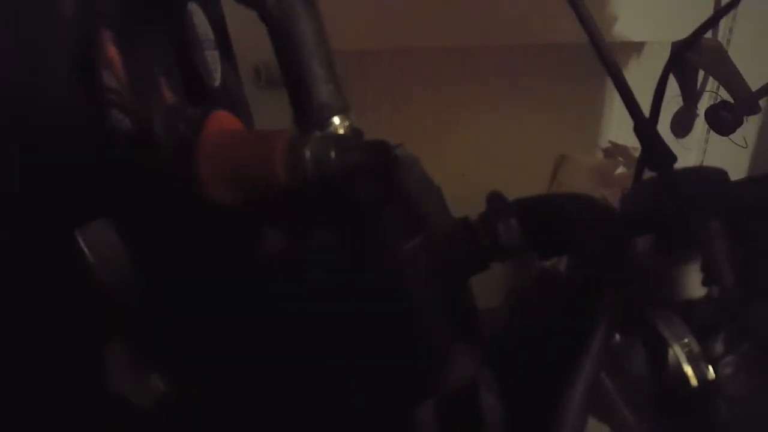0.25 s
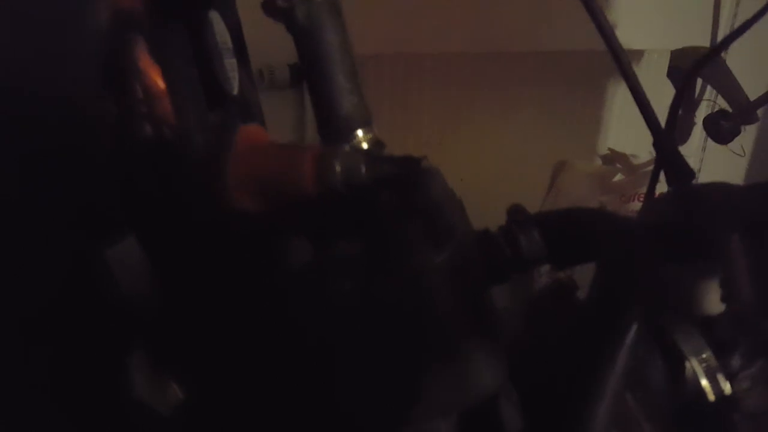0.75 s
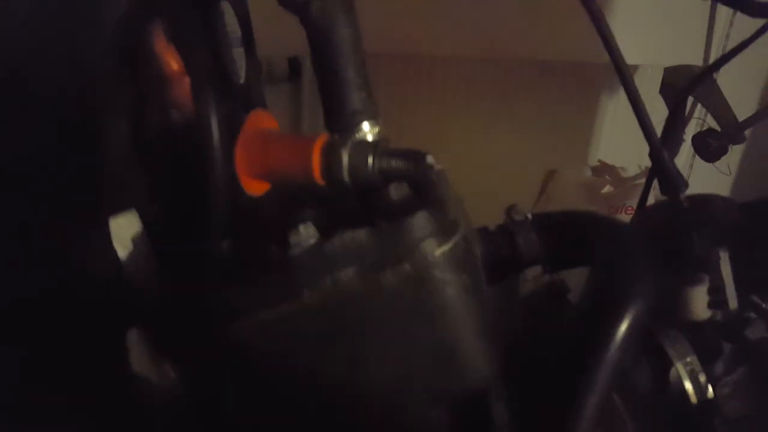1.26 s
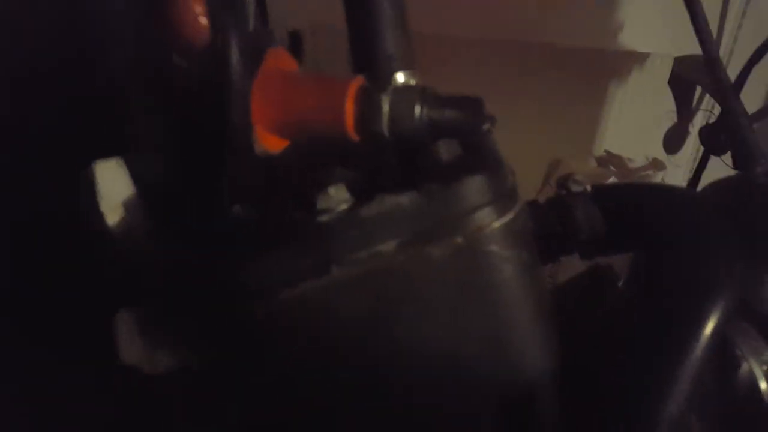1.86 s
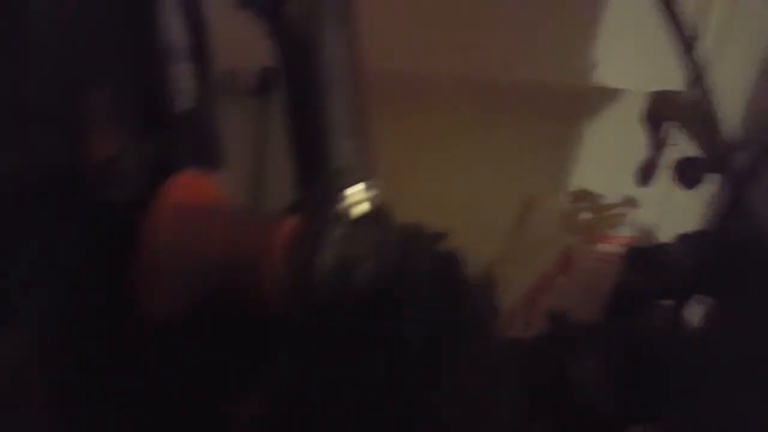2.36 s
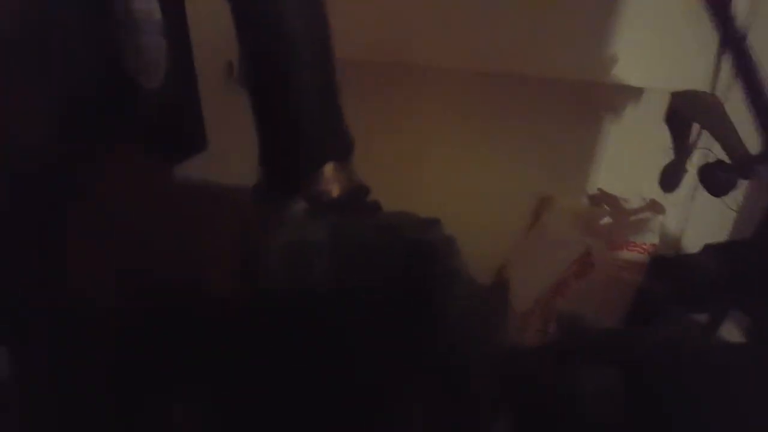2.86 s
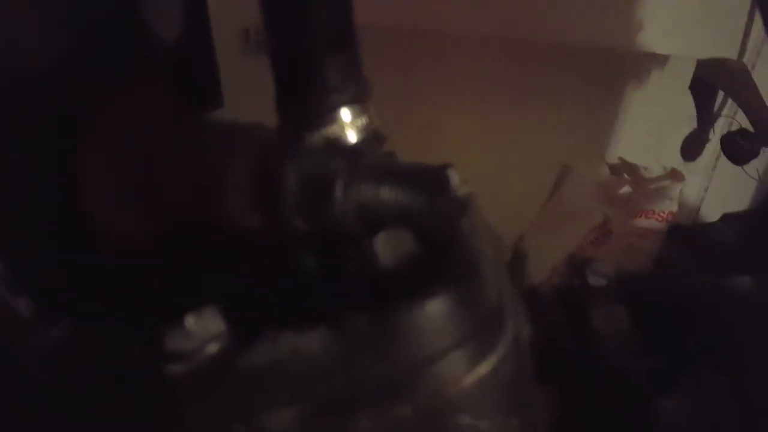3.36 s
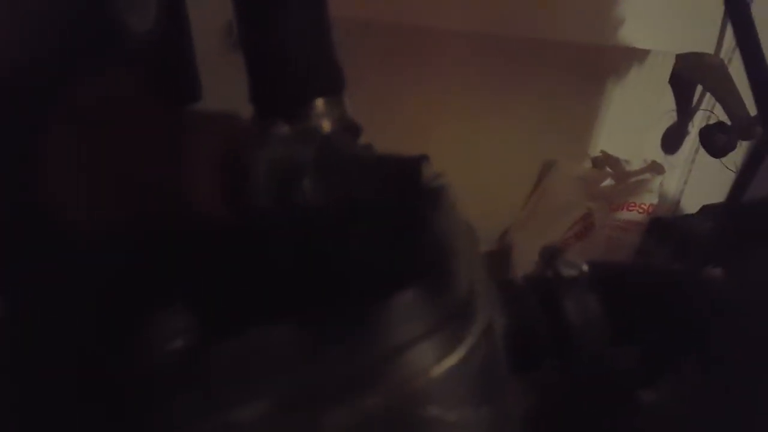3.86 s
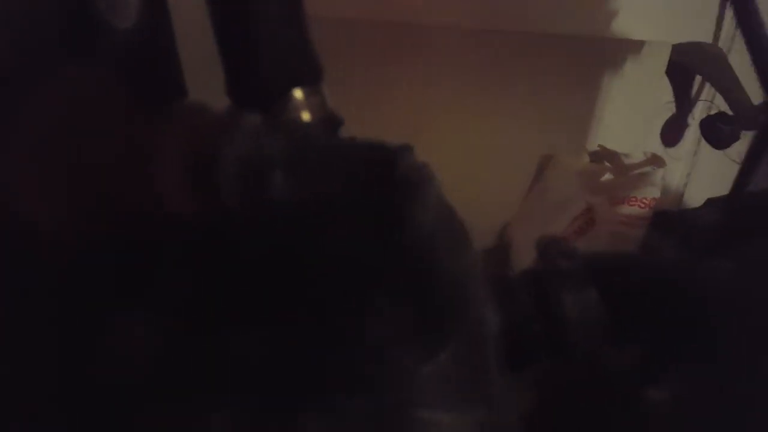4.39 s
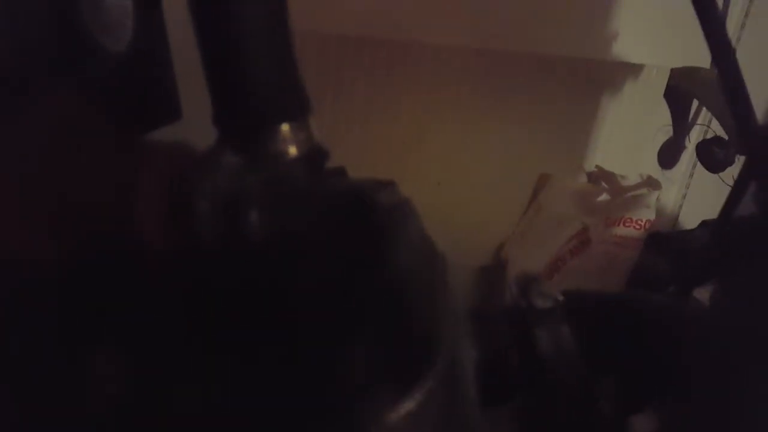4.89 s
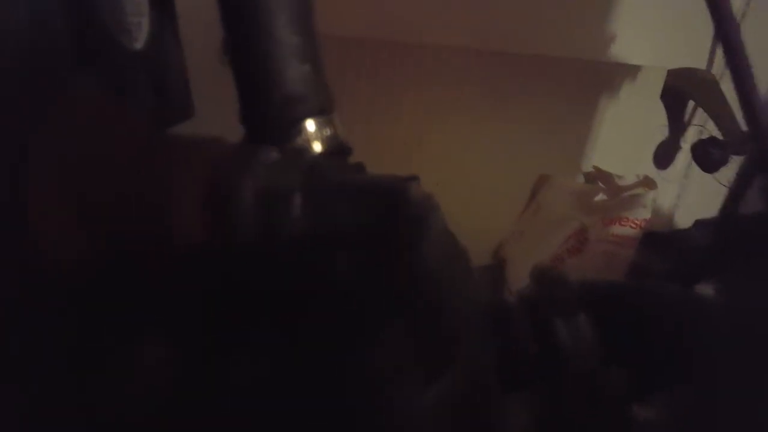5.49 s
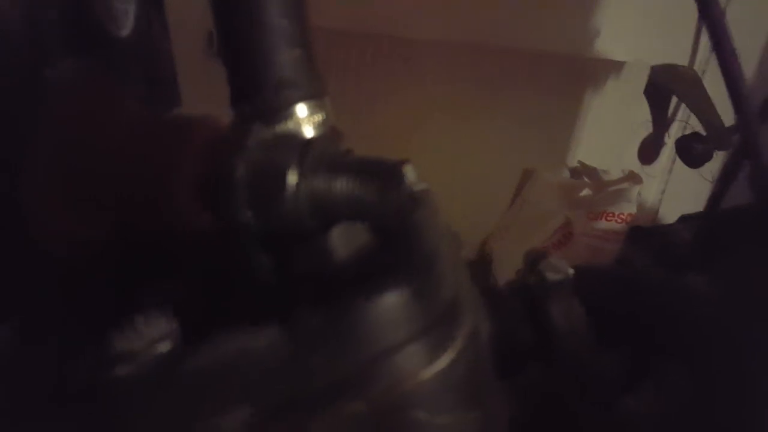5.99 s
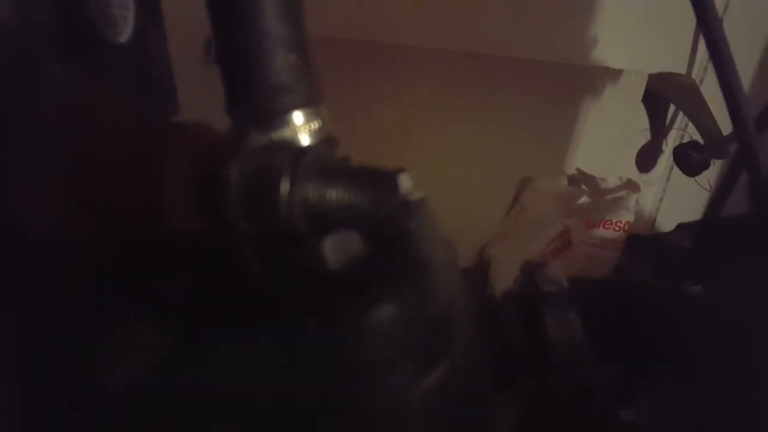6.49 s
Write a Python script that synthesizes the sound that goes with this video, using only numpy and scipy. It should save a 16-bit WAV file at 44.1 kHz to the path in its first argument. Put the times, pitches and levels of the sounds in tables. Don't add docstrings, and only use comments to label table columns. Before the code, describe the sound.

A motorcycle is kick-started twice without firing, each kick a hiss swelling into a rattling whirl, with ratchet clicks and a boot knock between.

```python
import sys
import numpy as np
from scipy import signal
from scipy.fft import rfft, irfft, next_fast_len
from scipy.io import wavfile
from scipy.ndimage import uniform_filter1d, map_coordinates

SR = 44100
rng = np.random.default_rng(int(sys.argv[2]) if len(sys.argv) > 2 else 0)


def store_pcm(level_fs):
    pcm = np.round(np.clip(level_fs, -1, 1) * 32767).astype(np.int16)
    wavfile.write(sys.argv[1], SR, np.atleast_2d(pcm).T)


def gain_from_db(level_db):
    decades = np.asarray(level_db, float) / 20
    return 10 ** decades


N = 297185
FAST = next_fast_len(N)
HZ = np.maximum(np.fft.rfftfreq(FAST, 1 / SR), 1)

TOP_DEAD_CENTRE = (1.1737, 5.68)
SEAL_S = (-.76, -.725)
# pitch in Hz, width in Hz, level in dB.
TIGHT_LEAK = [(4970, 53, -8), (6510, 76, -5.5), (7350, 90, -11), (8400, 71, -6.5), (9070, 170, 4),
              (10370, 98, -4.5), (11400, 88, -13.5), (11400, 89, -8.5), (11800, 180, -7),
              (12000, 340, -6.5), (13200, 410, -7), (14250, 200, -4), (14800, 200, -4), (14950, 200, -3)]
# frequency in Hz, level in dB per Hz.
TIGHT_AIR = [(1500, -23), (3000, -28.5), (4400, -40.5), (6000, -28), (8000, -23.5), (12800, -33),
             (15900, -24)]
# pitch in Hz, width in Hz, level in dB.
OPEN_LEAK = [(3670, 190, -12.5), (6770, 81, -2.5), (8000, 160, -10), (8340, 49, -5.5), (8950, 51, -8),
             (9400, 160, -1.5), (12500, 99, -4), (13700, 170, -11.5)]
# frequency in Hz, level in dB per Hz.
OPEN_AIR = [(1500, -22.5), (4300, -8.5), (6000, -6.5), (7000, 0.5), (9500, -1.5), (11800, -12),
            (15900, -4.5)]
# seconds from top dead centre, pitch factor.
GAP_PITCH = [(-0.94, 1.2), (-.65, 1.0), (-.42, .99), (0.039, .94), (0.41, 0.87)]
SECOND_GAP_SAG = 1.8
GAP_WAVER_DB = 2.5
# seconds from top dead centre, pitch in Hz.
CAVITIES = [
    [(-.66, 3450), (-.6, 3650), (-.42, 3650), (-.33, 3250), (-.25, 2750)],
    [(-.33, 2350), (-.25, 2480), (-.1, 2400)],
    [(-.6, 5800), (-.5, 5700), (-.4, 5650), (-.3, 5300), (-.13, 5100)],
    [(-.73, 4600), (-.66, 4480), (-.56, 3700)],
    [(-.31, 3850), (-.2, 3700), (-.12, 3500)],
    [(-.61, 9150), (-.5, 9050), (-.36, 8950)],
    [(-.72, 10200), (-.67, 9700), (-.62, 9200)],
    [(-.4, 8300), (-.33, 8750), (-.25, 8800)],
    [(-.32, 6950), (-.24, 6850)],
    [(-.82, 2600), (-.74, 3100), (-.66, 3300)],
]
CAVITY_DB = [(-61, -56, -55.5, -66, -59, -65, -56, -46.5, -52, -70),
             (-53, -54, -53.5, -53.5, -60, -51, -73, -60, -45, -85)]

# pitch in Hz, width in Hz, level in dB.
CASES = [(354, 63, -1.5), (499, 100, -3.5), (707, 15, -2.5), (885, 13, -3), (975, 12, 0), (1338, 7.3, -1),
         (1660, 55, -20)]
# frequency in Hz, level in dB per Hz.
RUMBLE = [(150, -43.5), (260, -6.5), (523, -8), (667, -8), (989, -4), (1450, -12), (1700, -11.5),
          (2400, -59)]
# frequency in Hz, level in dB per Hz.
THUD = [(18, -39), (30, -13), (102, -10.5), (140, 0.5), (157, 6), (179, -28), (200, -12.5), (300, -55)]
# frequency in Hz, level in dB per Hz.
CLATTER = [(1400, -9.5), (1950, 2), (2600, -9.5), (4500, -7.5)]
# frequency in Hz, level in dB per Hz.
BLOW_OFF = [(4500, -4.5), (5590, -4.5), (6300, -8.5), (9500, -12)]
# frequency in Hz, level in dB per Hz.
JET = [(9500, 1), (12600, -0.5), (15900, -4)]

# seconds from top dead centre, level in dB at the first kick,
# level in dB at the second, hold in seconds, fall in dB per s.
TIGHT_SURGES = [
    (-0.594, -55.5, -74.5, 0.026, 95),
    (-0.84, -47, -61.5, 0.29, 80),
    (-.58, -48, -41.5, 0.17, 78),
    (-.29, -36.5, -39.5, 0.12, 249),
]
OPEN_SURGES = [
    (-0.77, -48, -50.5, 0.28, 98),
    (-.29, -37.5, -42, 0.045, 70),
    (-0.206, -32.5, -38, 0.052, 279),
    (-.1, -48, -69.5, .01, 96.5),
]
BOOM_SURGES = [
    (-.6, -44, -43, .01, 64.5),
    (-.3, -58.5, -47.5, .02, 89.5),
    (-.14, -39, -30.5, 0.0055, 263),
    (.005, -29, -20.5, .005, 334.5),
    (.12, -33, -38, .17, 110),
]
RUMBLE_SURGES = [
    (-0.684, -48, -54.5, 0.011, 79),
    (-0.603, -58, -46.5, 0.0097, 107),
    (-.3, -55, -51.5, 0.17, 58.5),
    (-0.1347, -35, -35.5, 0.24, 201),
    (-0.0012, -22, -22.5, 0.12, 89),
]
THUD_SURGES = [
    (-.6, -59.5, -56, 0.01, 117),
    (-.14, -31, -30, .005, 197.5),
    (.005, -29.5, -25.5, .005, 221),
    (.1, -39, -37, 0.043, 67.5),
]
CLATTER_SURGES = [
    (-.13, -51.5, -46, 0.11, 197),
    (.02, -28, -22, 0.022, 251),
    (.05, -24, -24, 0.036, 166.5),
    (.19, -37, -40, 0.0092, 88),
]
BLOW_SURGES = [
    (.015, -23, -27, 0.069, 215),
    (.19, -39, -41, 0.00213, 113),
]
JET_SURGES = [
    (.02, -31.5, -30, .05, 151),
    (.13, -38.5, -36.5, .04, 220.5),
    (.3, -68.5, -73, .01, 35),
]
SWIFTER_RISE = 2.5

# start in seconds, peak
# in dB, pitch in Hz, decay by 60 dB in seconds, swell in seconds.
BUMPS = [(0.284, -29, 556, 0.018, 0.0013), (0.342, -34, 122, 0.029, 0.0019),
         (1.024, -11, 374.4, 0.088, .004), (1.059, -17, 150, 0.33, .003),
         (1.118, -12.5, 468, 0.058, 0.0072), (1.169, -2, 255, 0.031, .007), (1.209, -9.5, 974, 0.05, .003),
         (1.266, -8, 511, 0.06, .01), (1.268, -14, 975, .06, .006), (1.304, -7.5, 973, 0.09, .004),
         (1.328, -11, 975, .04, .004), (1.341, -12, 910, .03, .002), (1.36, -14, 975, .08, 0.0046),
         (1.371, -15.5, 242, 0.07, .008), (1.452, -13.5, 320, 0.038, 0.0012),
         (1.641, -29, 240, 0.058, .002), (2.148, -20, 135.5, 0.0077, 0.00095),
         (2.2238, -18.5, 4300, 0.015, 0.00019), (2.399, -37, 4000, .01, 0.00039),
         (3.374, -37.5, 3500, .015, .0003), (6.666, -5, 3700, 0.0066, 0.00044),
         (2.778, -38.5, 1083, 0.081, 0.0011), (3.381, -44, 505, .03, .002),
         (4.782, -30, 347.4, 0.13, 0.0011), (4.843, -25, 392, 0.068, 0.0012),
         (5.109, -30, 234, 0.12, 0.0024), (5.525, -10.5, 477, 0.025, .005), (5.539, -7, 384, 0.036, .003),
         (5.626, -12, 439, 0.062, .006), (5.676, -2, 249, 0.051, 0.0067), (5.701, -5.5, 328, .015, .001),
         (5.717, -8, 694, 0.02, .001), (5.769, -3, 536, 0.04, .013), (5.803, -7.5, 975, 0.041, .005),
         (5.813, -12.5, 532, 0.13, .006), (5.875, -19, 975, 0.091, 0.0033),
         (5.922, -18, 958, 0.065, 0.0039), (5.968, -10, 320, 0.049, .001), (6.006, -25, 312, 0.033, 0.0016),
         (6.388, -29.5, 1500, 0.021, 0.0011)]

# drop in seconds, seconds since the slip,
# peak in dB, dullness 0-1, left over right in dB.
PAWL = [
    (1.8349, .0124, -28.5, 0.58, 19),
    (2.0403, .0064, -20, 0.72, 0),
    (2.2239, 0.0088, -19, 0.5, 0),
    (6.3124, .0077, -23, 0.69, 22),
    (6.4676, .0078, -21.5, 0.59, -16.5),
    (6.666, .0073, -8.5, 0.25, -13),
]
SLIP_DB, SLIP_DULL, SLIP_PAN_DB, PAWL_RING_DB = -26.5, 0.56, 4, -43
# pitch in Hz, level in dB, decay by 60 dB in seconds.
LEVER = [(2700, -22, .15), (3350, -20, .15), (4100, -17, 0.15), (5070, -7, .25), (5280, -18, 0.15),
         (12490, -13, .15)]
# level in dB, decay factor.
PAWL_RINGS = [(1, 1.2), (0, 5.0), (-5, .6), (-2, .45), (-2, 1.1), (2, .6)]
RING_PITCH = (1, 1.02, 1, .99, .986, 1)
# start in seconds, peak in dB, dullness 0-1, left over right in dB.
TICKS = [(1.0944, -23.5, 0.21, 6), (1.203, -12.5, .5, 0), (1.212, -12, .6, -2), (1.223, -12.5, .5, 2),
         (1.34, -16, .5, 5.5), (1.427, -29, .4, 2), (1.451, -24.5, .8, -2), (1.4886, -31.5, .7, -4),
         (1.774, -52.5, 0.6, 14), (2.153, -29, 0.77, 18), (2.399, -35.5, 0.27, 19.5), (2.779, -38.5, 1, 6),
         (2.8507, -47.5, 0.64, 4.5), (2.9479, -45.5, 0.57, 23), (2.9517, -49.5, 0.7, 27),
         (3.3742, -38.5, 0.77, -6.5), (3.3788, -45.5, 0.7, 1.5), (3.4231, -43.5, 0.79, 5),
         (5.117, -36, 0.4, 20), (5.7083, -11, .6, -2), (5.7185, -7.5, .7, 2), (5.968, -25.5, 0.7, 2),
         (6.007, -28.5, .85, 2), (6.1844, -51, 0.64, -15), (6.1934, -52, 0, 20)]

# start in seconds, level in dB, hold in seconds, fall in dB per s.
DRAG = [
    (2.055, -38, .01, 600.5),
    (2.072, -26.5, 0.0072, 700.5),
    (2.088, -28.5, .006, 600),
    (2.101, -29.5, .003, 799.5),
    (2.114, -29.5, .005, 899.5),
    (2.148, -42, 0.005, 501.5),
    (2.13, -45.5, 0.075, 702),
]
# pitch in Hz, width in Hz, level in dB.
DRAG_RINGS = [(4990, 23, -4), (6440, 490, -10), (9080, 410, 1), (9740, 290, 3), (10720, 150, -5),
              (11500, 130, -9), (13500, 210, -5), (14300, 250, -5.5)]
# frequency in Hz, level in dB per Hz.
DRAG_COLOUR = [(1500, -19), (5500, -34.5), (9000, -15.5), (12300, -25), (14000, -15), (15900, -37)]
# start in seconds, level in dB, hold in seconds, fall in dB per s.
EASE = [
    (2.51, -50.5, 0.051, 195),
    (2.71, -53.5, 0.0039, 200),
    (2.73, -60.5, 0.11, 491),
]
# pitch in Hz, width in Hz, level in dB.
EASE_RINGS = [(2474, 64, -1), (3430, 480, -15.5), (5640, 46, -13), (6640, 86, -15), (8850, 61, -13.5),
              (9400, 40, -20.5)]
# frequency in Hz, level in dB per Hz.
EASE_COLOUR = [(180, -30), (300, -20), (2250, -9.5), (2480, -3), (2930, -12), (6520, -13.5), (16000, -25)]

# start in seconds, peak in dB.
KNOCK = [
    (3.4888, -15),
    (3.4914, -18),
    (3.4963, -15.),
    (3.499, -12),
    (3.5016, -6.5),
    (3.505, -9.5),
    (3.511, -16),
]
# pitch in Hz, level in dB, decay by 60 dB in seconds.
STAND = [(234, -22, 0.54), (369, -5.5, 0.096), (570, -4, 0.015), (1103, -13, 0.15), (1500, -2.5, 0.03),
         (1549, -10, 0.27), (2470, -16.5, .03)]

# time in seconds, pitch in Hz.
WHISTLES = [
    [(.04, 9700), (.11, 10500), (.24, 10000), (.27, 11100), (.32, 11650)],
    [(.31, 11900), (.36, 13200), (.4, 13450)],
    [(.26, 12200), (.32, 12950)],
    [(0, 12650), (.05, 13050)],
    [(2.82, 14350), (2.92, 13900), (2.99, 14200), (3.03, 13500), (3.14, 13900), (3.2, 12550), (3.29, 12750),
     (3.35, 11900), (3.4, 11450)],
    [(3.16, 13500), (3.21, 13000), (3.29, 13250), (3.4, 12000)],
    [(6.12, 11800), (6.3, 12400)],
]
WHISTLE_DB = [-83, -71, -80, -79, -76, -79, -79]
FADE_S = .02

# start in seconds, level
# in dB, hold in seconds, fall in dB per s.
RUSTLE = [
    (1.66, -56.5, .08, 200.5),
    (4.37, -69.5, .02, 150),
    (4.45, -69, .02, 150),
]
# frequency in Hz, level in dB per Hz.
RUSTLE_COLOUR = [(1200, 0), (5000, -6.5), (15000, -9)]
# frequency in Hz, level in dB per Hz.
FLOOR = [(20, -16), (35, -18), (101, -9.5), (172, -10.5), (277, -6), (340, -9), (5380, -28.5), (16400, -34)]
FLOOR_DB = -64.5

# frequency in Hz, decay by 60 dB in seconds.
ROOM_T60 = [(100, 0.47), (500, 0.51), (2000, 0.47), (6000, 0.38), (14000, 0.7)]
# frequency in Hz, level in dB.
ROOM_COLOUR = [(60, -27), (150, 4.5), (400, 9), (1500, 8), (5000, 8.5), (14000, -2.5)]
# frequency in Hz, left-right likeness.
LIKENESS = [(20, 0.39), (150, 1), (250, 0.89), (500, 0.45), (1000, 0.), (16000, 0.)]
# frequency in Hz, left over right in dB.
LEANING = [(60, 2), (180, 0), (550, 2), (1650, 1.5), (4970, 2), (15000, 6.5)]
HISS_LEAN_DB, DRAG_LEAN_DB = 2.5, 4


def compression():
    t = np.arange(N) / SR
    s, factor = np.transpose([(top + s, f) for top in TOP_DEAD_CENTRE for s, f in GAP_PITCH])
    factor = np.interp(t, s, factor)
    first_gap = gap(TIGHT_AIR, TIGHT_LEAK[::2], factor, ring_db=2.5)
    second_gap = gap(TIGHT_AIR, TIGHT_LEAK[1::2], factor ** SECOND_GAP_SAG, ring_db=3.5)
    tight = gain_from_db(-2.5) * first_gap + gain_from_db(-3.0) * second_gap
    wide = gap(OPEN_AIR, OPEN_LEAK, factor / 0.97, ring_db=11.0)
    glides = [np.add(glide, (top, 0)) for top in TOP_DEAD_CENTRE for glide in CAVITIES]
    hollows = breathy_tones(glides, np.ravel(CAVITY_DB), width_hz=98.0, clear=0.33)

    first, second = [np.clip((t - top - s) / 0.11, 0, 1) for top, s in zip(TOP_DEAD_CENTRE, SEAL_S)]
    sealed = np.where(t < np.mean(TOP_DEAD_CENTRE), first, second)
    leaks = each_kick(TIGHT_SURGES) * tight + each_kick(OPEN_SURGES) * wide
    hollows_open = np.where(t < TOP_DEAD_CENTRE[0], 1, sealed)
    return sealed * gain_from_db(drift(24)) * leaks + hollows_open * gain_from_db(drift(16.8)) * hollows


def crank():
    t = np.arange(N) / SR
    boom = coloured([(200, -33.0), (260, -26.0)], [(232.0, 26, 0.017)])
    rumble = coloured(RUMBLE, CASES, ring_db=2.0, grains_per_s=900., grain_db=3.0)
    thud = coloured(THUD, [(158, 20, 0.0), (50.85, 20, -7.5)])
    clatter = coloured(CLATTER, grains_per_s=330.0, grain_db=3.0)
    puff = coloured(BLOW_OFF, grains_per_s=800.0, grain_db=5.0)
    after_top = sum(np.clip((t - s) / 0.0072, 0, 1) * (t < s + 1.5) for s in TOP_DEAD_CENTRE)
    blow = after_top * (each_kick(BLOW_SURGES) * puff + each_kick(JET_SURGES) * coloured(JET))
    gears = each_kick(RUMBLE_SURGES) * rumble + each_kick(CLATTER_SURGES) * clatter + blow
    return each_kick(BOOM_SURGES) * boom + each_kick(THUD_SURGES) * thud + gain_from_db(2.0 * drift(36.0)) * gears


def bumps():
    out, t = np.zeros(N), np.arange(SR // 3) / SR
    for s, db, hz, t60, swell in BUMPS:
        rise = np.sin(np.pi / 2 * np.clip(t / max(swell, 1e-4), 0, 1)) ** 2
        fall_db = -60 * np.maximum(t - swell, 0) / max(t60, .003)
        note = np.sin(2 * np.pi * hz * t) * gain_from_db(fall_db)
        note += gain_from_db(-10.0 + fall_db / 0.33) * np.sin(2 * np.pi * 1.6 * hz * t)
        out += np.pad(gain_from_db(db - 6.5) * rise * note, (int(s * SR), N))[:N]
        out += crack(s + .4 * swell, db - 23.5, dull=.85, length_s=0.0037, grit=0.86)
    return out


def ratchet():
    slips = [(s - lead, SLIP_DB, SLIP_DULL, SLIP_PAN_DB) for s, lead, *_ in PAWL]
    drops = [(s, *rest) for s, lead, *rest in PAWL]
    pulses, placed = np.zeros(N), np.zeros((2, N))
    for s, db, dull, pan_db in [*slips, *drops, *TICKS]:
        pulses += crack(s, db, dull, length_s=.001, grit=0)
        placed += crack(s, db, dull, length_s=0.0022, grit=0.39) * gain_from_db([[pan_db / 2], [-pan_db / 2]])
    rings = np.zeros(N)
    for (s, lead, *_), pitch, (db, lasting) in zip(PAWL, RING_PITCH, PAWL_RINGS):
        modes = np.multiply(LEVER, (pitch, 1, 1))
        rings += struck(np.array([s - lead, s]), PAWL_RING_DB + db, modes, shorten=lasting)
    to_walls = signal.sosfilt(signal.butter(2, 650., "high", fs=SR, output="sos"), pulses + gain_from_db(-19) * rings)
    close = signal.sosfilt(signal.butter(1, 700., "high", fs=SR, output="sos"), placed) + rings
    return to_walls, close


def lever_moves():
    drag = coloured(DRAG_COLOUR, DRAG_RINGS, ring_db=1.0, grains_per_s=110.0, grain_db=10.0)
    ease = coloured(EASE_COLOUR, EASE_RINGS, ring_db=11.0, grains_per_s=200., grain_db=5.0)
    return surges(DRAG) * gain_from_db(1.5 * drift(40.)) * drag + surges(EASE) * gain_from_db(1.5 * drift(29.6)) * ease


def knock():
    rows = np.array(KNOCK)
    modes = struck(rows[:, 0], rows[:, 1] - 10, STAND, shorten=1)
    pulses = sum(crack(s, db - 4, dull=.8, length_s=.003, grit=.4) for s, db in rows)
    hardest = crack(*rows[rows[:, 1].argmax()], dull=0.78, length_s=.001, grit=0)
    to_walls = gain_from_db(8.5) * hardest + gain_from_db(-6.5) * modes
    return signal.sosfilt(signal.butter(1, 3000., fs=SR, output="sos"), [modes + pulses, to_walls])


def whistles():
    return breathy_tones(WHISTLES, WHISTLE_DB, width_hz=40., clear=1.5)


def rustle():
    return surges(RUSTLE) * coloured(RUSTLE_COLOUR)


def room(x, wet_db):
    t, tail = np.arange(SR) / SR, 0
    mid, side = rng.standard_normal((2, SR))
    edges = 45 * 2 ** np.arange(0, 8.6, .5)
    for low, high in zip(edges, edges[1:]):
        hz = np.sqrt(low * high)
        alike = np.clip(at_hz(LIKENESS, hz), 0, 1)
        pair = np.sqrt(1 + alike) * mid + np.sqrt(1 - alike) * side * [[1], [-1]]
        band = signal.sosfilt(signal.butter(2, [low, high], "band", fs=SR, output="sos"), pair)
        tail = tail + band * gain_from_db(at_hz(ROOM_COLOUR, hz) - 60 * t / at_hz(ROOM_T60, hz))
    tail = tail * np.clip(t / 0.0012, 0, 1)
    return gain_from_db(wet_db) * signal.fftconvolve(x[None], tail, axes=1)[:, :N]


def background():
    return gain_from_db(FLOOR_DB + 0.19 * drift(2.5)) * coloured(FLOOR)


def gap(air, leak, factor, ring_db):
    reading = np.cumsum(factor) % (N - 1)
    ports = coloured(air, leak, ring_db=ring_db)
    moved = np.array([map_coordinates(port, [reading], order=2) for port in ports])
    return gain_from_db(GAP_WAVER_DB * drift(6.8)) * moved


def breathy_tones(glides, levels_db, width_hz, clear):
    out, waver = np.zeros((2, N)), np.array([drift(width_hz) for _ in "LRLR"])
    for glide, db in zip(glides, levels_db):
        s, hz = np.transpose(glide)
        at = np.arange(int(s[0] * SR), int(s[-1] * SR))
        t = at / SR
        elsewhere = at - at[0] + rng.integers(N // 2)
        phase = 2 * np.pi * np.cumsum(uniform_filter1d(np.interp(t, s, hz), size=600)) / SR
        fade = np.clip(np.minimum(t - s[0], s[-1] - t) / FADE_S, 0, 1)
        tone = (clear + waver[:2, elsewhere]) * np.sin(phase) + waver[2:, elsewhere] * np.cos(phase)
        out[:, at] += gain_from_db(db) * fade * tone
    return out / np.sqrt(1 + clear ** 2 / 2)


def coloured(spectrum, peaks=(), ring_db=0., grains_per_s=0., grain_db=-60.):
    mid, side = rng.standard_normal((2, N))
    luck, sizes = rng.uniform(-1, 1, N), rng.exponential(1, N)
    hit = np.abs(luck) < grains_per_s / SR
    mid[hit] += gain_from_db(grain_db + 5.18 * np.minimum(sizes[hit], 3.5)) * np.sign(luck[hit])
    power = gain_from_db(2 * at_hz(spectrum)) * (HZ > spectrum[0][0]) * (HZ < spectrum[-1][0])
    for hz, width, db in peaks:
        power = power + gain_from_db(2 * (db + ring_db)) / (1 + (2 * (HZ - hz) / width) ** 2) ** 2
    alike = np.clip(at_hz(LIKENESS), 0, 1)
    shared = np.sqrt(1 + alike) * rfft(rms_one(mid), FAST)
    apart = np.sqrt(1 - alike) * rfft(side, FAST) * [[1], [-1]]
    return rms_one(irfft((shared + apart) * np.sqrt(power), FAST)[:, :N])


def surges(rows):
    t = np.arange(0, N / SR + .01, .001)
    power = 0
    for s, db, hold, fall in rows:
        away_s = SWIFTER_RISE * np.maximum(s - t, 0) + np.maximum(t - s - hold, 0)
        power = power + gain_from_db(2 * (db - fall * away_s))
    return np.interp(np.arange(N) / SR, t, np.sqrt(power))


def each_kick(rows):
    return surges([(top + s, levels_db[k], hold, fall)
                   for k, top in enumerate(TOP_DEAD_CENTRE) for s, *levels_db, hold, fall in rows])


def struck(times, levels_db, modes, shorten):
    out, spread_db = np.zeros(N), rng.normal(0, 2.5, (len(times), len(modes)))
    for k, (hz, db, t60) in enumerate(modes):
        clicks = np.zeros(N)
        clicks[(times * SR).astype(int)] = gain_from_db(levels_db + db + spread_db[:, k])
        out += ring(clicks, hz, shorten * t60)
    return out


def ring(clicks, hz, t60):
    r, w = gain_from_db(-60 / (max(t60, .003) * SR)), 2 * np.pi * hz / SR
    return signal.lfilter([0, np.sin(w)], [1, -2 * r * np.cos(w), r * r], clicks + 1e-18)


def crack(s, db, dull, length_s, grit):
    t = np.arange(int(.02 * SR)) / SR
    r = np.clip(dull, 0, .95)
    pulse = (t == 0) + grit * rng.standard_normal(len(t)) * np.exp(-t / length_s)
    softened = signal.lfilter([1], [1, -2 * r, r * r], pulse)
    burst = signal.lfilter([1, -1], [1, -.88], softened)
    return np.pad(gain_from_db(db) * burst / np.abs(burst).max(), (int(s * SR), N))[:N]


def drift(rate):
    steps = rng.standard_normal(int(N / SR * 1000) + 2)
    r = np.exp(-2 * np.pi * rate / 1000)
    slow = signal.lfilter([1], [1, -2 * r, r * r], steps)
    return np.interp(np.arange(N) / SR * 1000, np.arange(len(steps)), rms_one(slow))


def at_hz(points, hz=HZ):
    return np.interp(np.log(hz), np.log(np.array(points)[:, 0]), np.array(points)[:, 1])


def rms_one(x):
    return x / np.sqrt(np.mean(x ** 2) + 1e-20)


def scene():
    left = np.array([[.5], [-.5]])
    engine = gain_from_db(HISS_LEAN_DB * left) * compression() + crank() + gain_from_db(DRAG_LEAN_DB * left) * lever_moves()
    engine = irfft(rfft(engine, FAST) * gain_from_db(at_hz(LEANING) * left), FAST)[:, :N]
    clicks, placed = ratchet()
    no_bass = signal.butter(2, 110, "high", fs=SR, output="sos")
    dull, blow, echoed = signal.sosfilt(no_bass, [bumps(), *knock()])
    reflections = room(gain_from_db(6.0) * clicks + gain_from_db(-7.0) * dull + gain_from_db(-1.0) * echoed, wet_db=-31.0)
    near = placed + (dull + blow) * gain_from_db([[1.5], [-1.5]])
    return engine + near + reflections + whistles() + rustle() + background()


def low_pass(x):
    return signal.sosfilt(signal.butter(12, 16720, fs=SR, output="sos"), x)


def record(dry):
    x = signal.sosfilt(signal.butter(2, 25, "high", fs=SR, output="sos"), dry)
    x = signal.sosfilt(signal.cheby2(10, 30, 16750, fs=SR, output="sos"), x)
    mix = 1.455 * np.tanh(x / 1.58)
    return low_pass(mix)


dry = scene()
out = record(dry)
store_pcm(out)
```